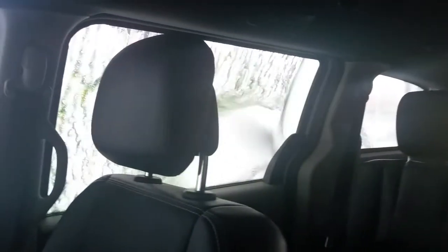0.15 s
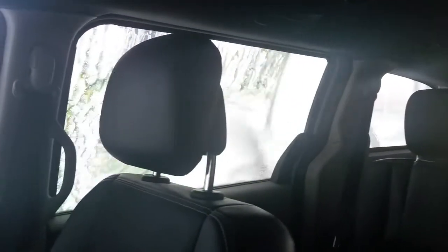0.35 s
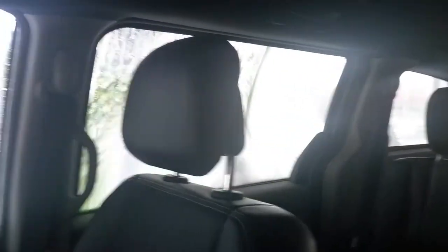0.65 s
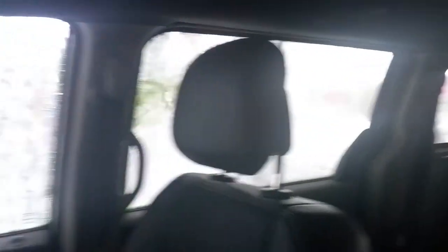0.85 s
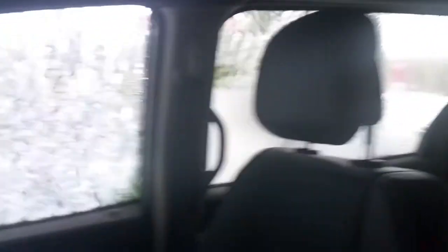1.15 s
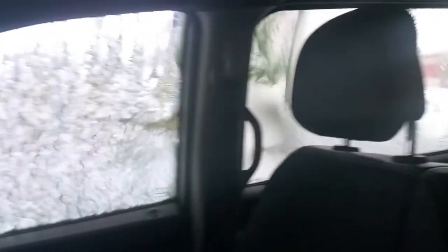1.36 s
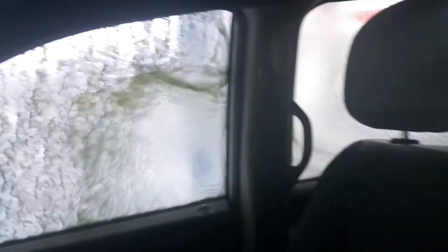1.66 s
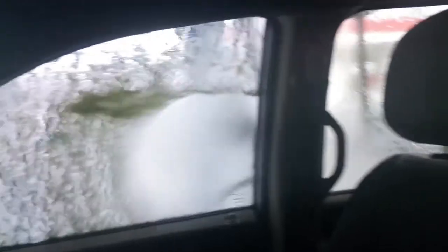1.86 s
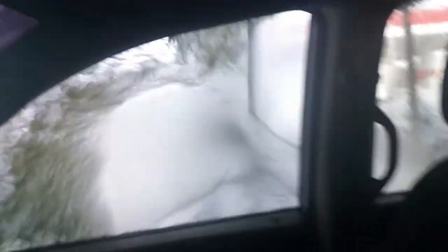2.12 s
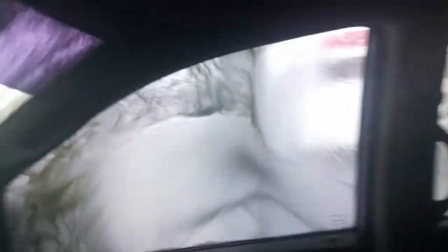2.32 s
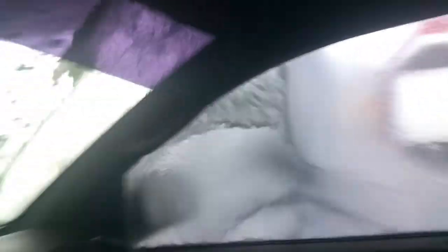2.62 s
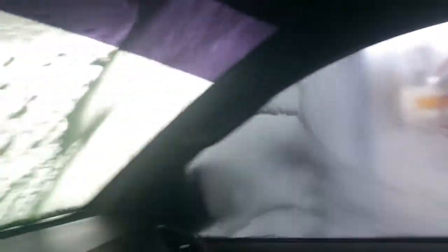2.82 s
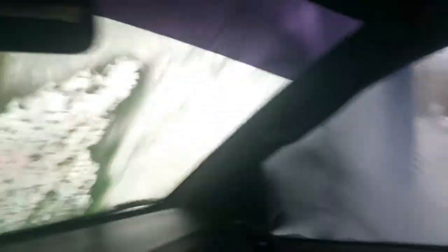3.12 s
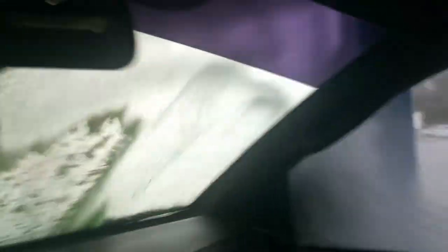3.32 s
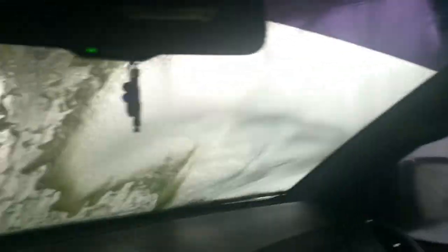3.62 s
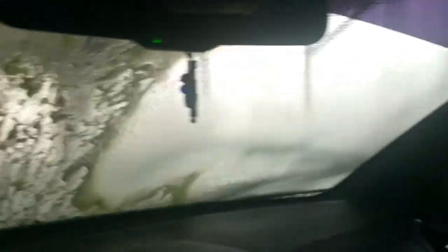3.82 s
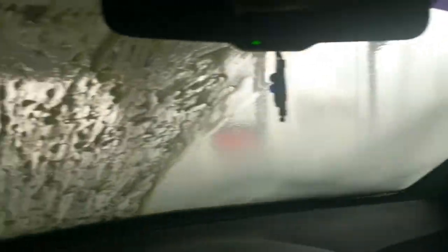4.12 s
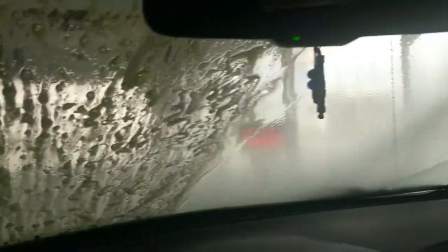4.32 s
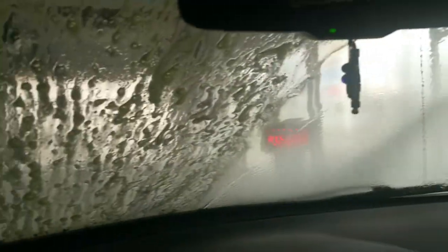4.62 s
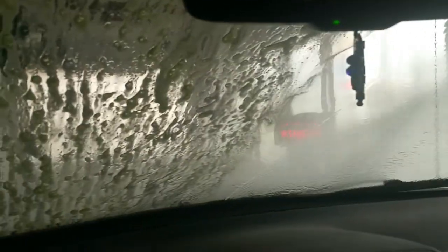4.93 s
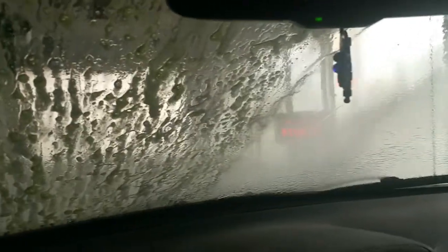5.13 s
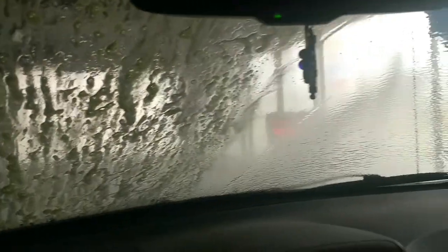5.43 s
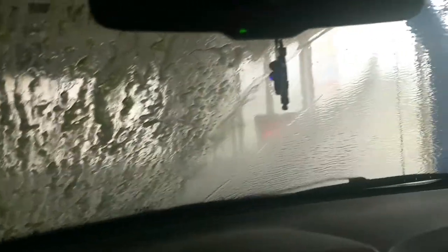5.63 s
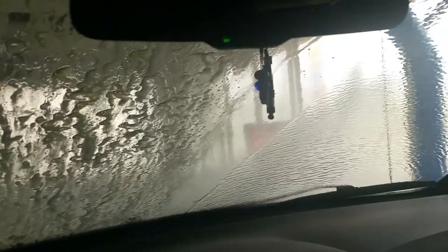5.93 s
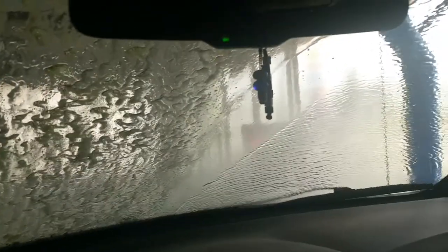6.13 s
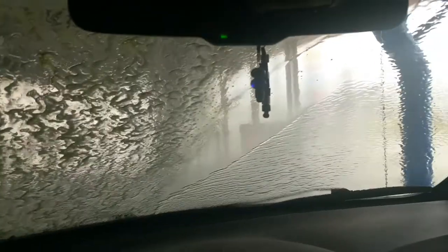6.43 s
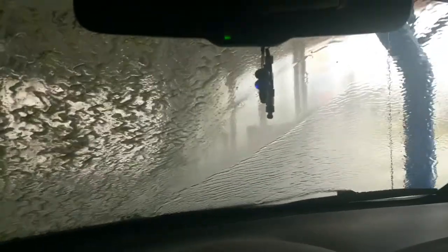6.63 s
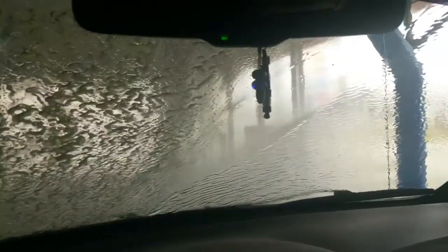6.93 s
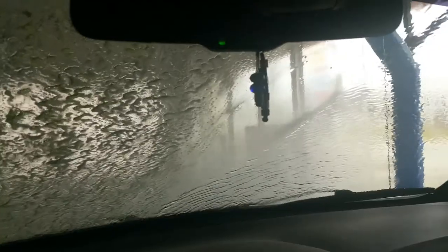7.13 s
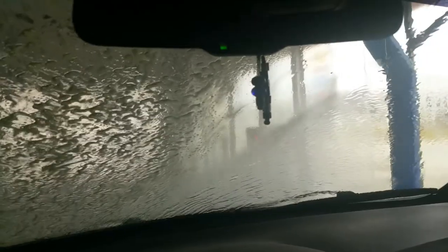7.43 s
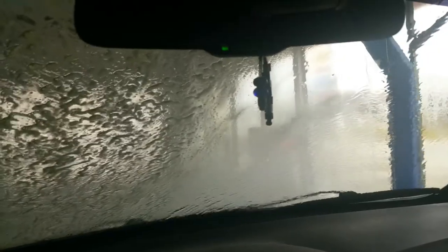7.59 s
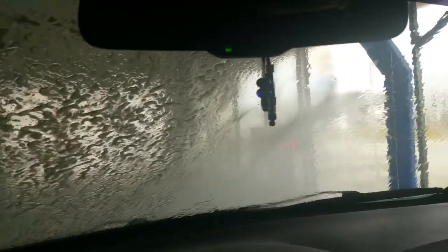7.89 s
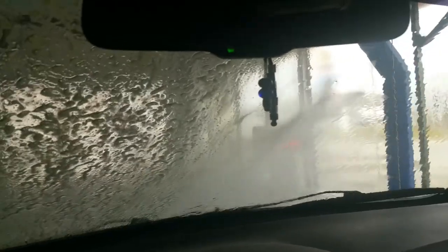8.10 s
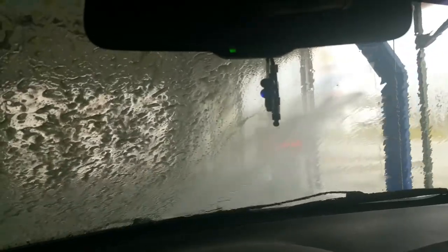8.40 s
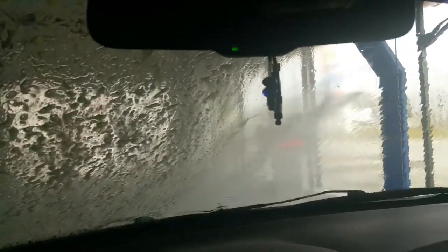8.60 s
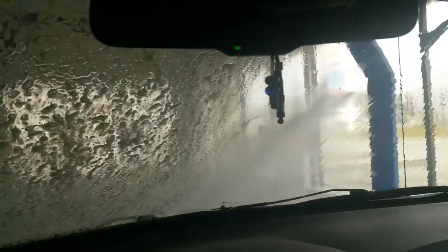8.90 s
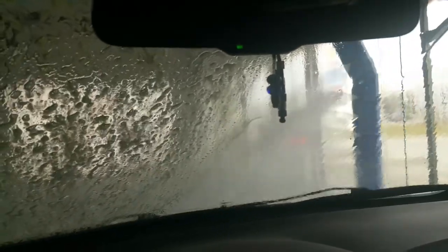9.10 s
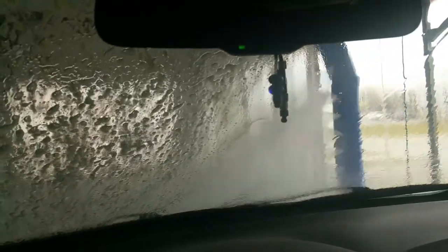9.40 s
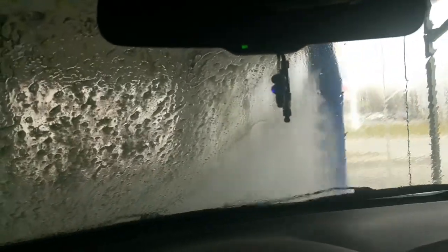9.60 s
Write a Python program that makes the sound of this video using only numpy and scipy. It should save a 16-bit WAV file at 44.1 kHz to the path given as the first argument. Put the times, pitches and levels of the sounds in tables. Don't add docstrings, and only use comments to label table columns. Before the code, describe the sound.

Continuous water noise heard by a handheld stereo microphone in a small padded cabin. Bursting spray hisses against side windows while doors, panes and sheet metal drum and resonate unevenly. After about four seconds the spray moves to the front, loses its sizzle and quietens to a muffled, low roar, with one faint dull knock on the roof late on.

```python
import sys
import numpy as np
from scipy import signal
from scipy.fft import rfft, irfft
from scipy.io import wavfile
from scipy.ndimage import uniform_filter1d

SR = 44100
rng = np.random.default_rng(int(sys.argv[2]) if len(sys.argv) > 2 else 0)


def wav_record(signal):
    frames = np.transpose(np.atleast_2d(signal))
    bounded = np.clip(frames, -1, 1)
    quanta = np.round(bounded * 32767).astype(np.int16)
    wavfile.write(sys.argv[1], SR, quanta)


def boost(x):
    u = np.asarray(x, float) / 20
    return 10 ** u


N = 429975
SIZE = 432000
SLOW = 10


FACING_AHEAD = [
    0.02,
    .4,
    .95,
    1.05,
]
# time in seconds, panel frequency in Hz, change in dB, half length in seconds.
CROSSINGS = [(0.0, 342, -6, 0.096), (2.106, 130, 6, 0.21), (2.16, 193, -2, 0.3), (2.646, 129, -4, 0.098),
             (2.7, 44.7, 4, 0.13), (2.704, 256, 4, 0.074), (3.057, 500, -5, 0.12), (3.12, 350, -4.5, 0.29),
             (3.64, 900, 7.5, 0.19), (3.72, 130, -14, 0.061), (4.077, 346, 5.5, 0.17),
             (4.26, 189, -7, 0.17), (4.792, 104, 2.5, 0.1), (5.104, 130, 8, 0.13), (5.28, 100, -9, 0.13),
             (6.42, 190, 4.5, 0.35), (6.48, 129, -2.5, 0.2), (6.84, 44.7, 5, 0.22), (7.26, 103, -10, 0.08),
             (7.44, 195, 6.5, 0.13), (8.1, 102, 2, 0.29), (8.4, 346, 3.5, 0.14), (8.52, 45, -7, 0.13),
             (8.58, 190, 0, 0.35), (8.94, 129, 5, 0.1), (9.6, 682, -1, 0.13)]
# time in seconds, part frequency in Hz, change in
# dB, half length in seconds.
PANEL_SWELLS = [(2.06, 255, -4, 0.071), (1.33, 255, 2.5, 0.11), (1.82, 540, 2.5, .1), (.6, 255, 3, .1),
                (.1, 900, -3, 0.092), (2.778, 590, 7, .03), (3.3, 346, 2.5, 0.13), (5.75, 500, 2, .1),
                (.78, 164, 5, 0.12), (1.9, 165, 4, .15), (3.6, 165, 4.5, 0.28), (4.9, 165, 3.5, 0.21),
                (6.3, 168, 5, 0.093), (8.85, 165, -5, 0.11), (9.55, 165, -2, .15), (.5, 45, 2, .4),
                (3.2, 125, 2.5, 0.16), (4.514, 130, -9, 0.066), (4.1, 50, -4, .1), (4.45, 50, 4, .1),
                (5.1, 100, -1, .08), (6.6, 100, 1.5, .12), (0.523, 417, 5, .05), (0.804, 500, 2, .05),
                (.82, 255, -4, 0.13), (1.2, 346, 3, 0.16), (1.74, 189, 1, 0.11), (1.36, 860, -3, 0.12),
                (1.997, 346, 6, 0.059), (2.24, 346, -3, 0.054), (2.96, 682, 2.5, 0.19),
                (3.45, 500, -1.5, 0.12), (4.063, 420, 7, 0.043), (4.23, 500, 7.5, 0.033),
                (4.23, 682, 5, 0.035), (4.36, 860, 2, .2), (4.642, 346, 3.5, .1), (5.36, 500, 1.5, 0.12),
                (5.48, 860, 4, .2), (9.32, 860, 6, .1), (9.56, 346, 4.5, 0.12)]
# time in seconds, panel frequency
# in Hz, change in dB, half length in seconds.
SURGES = [(0.09, 860, -4, 0.057), (0.35, 171, -15, 0.071), (0.592, 346, 2.5, 0.21), (0.83, 130, -1, 0.12),
          (1.15, 167, -2, 0.13), (1.66, 168, -5, 0.14), (1.87, 255, 2, 0.22), (1.95, 130, -4, 0.13),
          (2.01, 104, 2.5, 0.13), (2.69, 104, -2.9, 0.1), (3.09, 205, 3.5, 0.13), (3.141, 168, -5, 0.23),
          (3.21, 103, -0.5, 0.25), (3.78, 130, -2.7, 0.25), (3.78, 682, -5, 0.14), (3.83, 346, -2.5, 0.25),
          (4.24, 205, 4, 0.19), (4.65, 130, 4.5, 0.085), (4.78, 205, -4.2, 0.18), (5.14, 104, -5, 0.14),
          (5.8, 205, 3.5, 0.2), (5.97, 130, 2, 0.07), (6.42, 346, 4.5, 0.19), (6.6, 170, 2.5, 0.22),
          (7.36, 104, -5, 0.07), (7.56, 255, 2, 0.2), (7.65, 205, -6, 0.11), (7.79, 168, 6, 0.12),
          (8.16, 255, -1.5, 0.1), (8.495, 130, 2, 0.14), (9.41, 130, 2.5, 0.11)]


def rms_one(x):
    return x / np.sqrt(np.mean(x ** 2) + 1e-20)


def in_time(rows, count=1):
    s, *columns = np.transpose(rows)
    t = np.arange(0, SIZE, count) / SR
    return [np.interp(t, s, column) for column in columns]


def at_hz(points, hz, order=1):
    points = np.array(points)
    return np.interp(np.log(hz), np.log(points[:, 0]), points[:, order])


def drift(rate):
    pole = np.exp(-80 * np.pi * rate / SR)
    white = rng.standard_normal(SIZE // 40 + 2002)
    slow = signal.lfilter([1], [1, -2 * pole, pole * pole], white)[2000:]
    return np.interp(np.arange(SIZE) / 40, np.arange(len(slow)), rms_one(slow))


def panned(x, pan_db):
    return x * boost(np.array([[1], [-1]]) * pan_db / 2)


def shares(count=1):
    # time in seconds, place [0-3].
    path = [
        (0, 0),
        (1.0, -0.03),
        (1.85, 1),
        (3.7, 1),
        (4.0, 1.34),
        (4.45, 2),
        (5.4, 2),
        (6.0, 3),
        (9.75, 3),
    ]
    place = in_time(path, count=count)[0]
    return [np.clip(1 - abs(place - k), 0, 1) for k in range(4)]


def cabin_echoes(count, t60):
    t = np.arange(4000 // count) * count / SR
    after_first_wall = t > .004
    paths = rng.standard_normal((2, len(t))) * boost(-60 * t / t60) * after_first_wall
    energy = np.sum(paths ** 2, axis=1, keepdims=True)
    return rfft(paths / np.sqrt(energy), SIZE // count)


def stereo_white(ahead, ripple, spot, count=1):
    # frequency in Hz, likeness [-1 to 1] facing the side,
    # likeness facing ahead, left over right in dB facing the side, the same facing ahead.
    ports = [(50, .98, .995, 1.9, 1.6), (105, .989, .955, .4, 1.8), (135, .985, .95, 1.5, 2),
             (170, .93, .935, -.3, 2.4), (205, .992, .92, .2, -.7), (260, .955, .96, -.2, 0),
             (340, .924, .68, -.7, 4.2), (405, .87, .7, .8, -.8), (480, .84, .68, -.3, .6),
             (580, .74, .75, .6, .1), (680, .7, .6, -.7, -1), (820, .45, .15, 1.2, -1.4),
             (940, .3, -.4, 1.9, -1.6), (1050, .15, -.27, 2.5, -1.7), (1250, .07, -.08, 3, -1.7),
             (1500, -.35, -.25, .7, -2.3), (1640, -.5, -.35, -.3, -2.4), (1850, -.1, -.08, -1.8, -2.6),
             (2150, .35, .33, .2, -1.6), (2550, .05, .3, 1, -.5), (2850, -.08, 0, .9, 0),
             (3200, -.05, -.38, -.3, .6), (3600, -.2, -.1, -1.3, .7), (4400, -.05, .1, -2.3, -.2),
             (5500, -.03, -.08, -1.5, -.8), (6500, 0, 0, -3.7, -3.2), (7200, 0, 0, -10, -6),
             (8000, 0, 0, -3.5, -1), (9500, 0, 0, -2.6, -1.2), (15000, 0, 0, -2.9, .2)]
    # frequency in Hz, quarter-cycle likeness [-1 to 1]
    leads = [(250, 0, 0), (430, .12, .1), (600, .25, .25), (740, .05, .5), (860, -.1, .35),
             (1030, .05, .05), (1300, .28, .05), (1550, .05, 0), (1900, -.28, .2), (2200, -.05, 0),
             (2600, 0, -.25), (3100, 0, 0), (3500, -.1, .12), (4400, 0, 0)]
    hz = np.fft.rfftfreq(SIZE // count, count / SR) + 1
    real, imaginary = rng.standard_normal((2, 2, len(hz))) * np.sqrt(SIZE / count / 2)
    mid, side = real + 1j * imaginary
    to_mid, to_side = cabin_echoes(count=count, t60=.07)
    side = np.sqrt(1 - spot) * side + np.sqrt(spot) * mid * to_side
    mid = mid * (1 + ripple * to_mid) / np.sqrt(1 + ripple ** 2)

    def turned(points, order):
        return (1 - ahead) * at_hz(points, hz, order=order) + ahead * at_hz(points, hz, order=order + 1)

    coherence = turned(ports, 1) + 1j * turned(leads, 1)
    tilt_db = turned(ports, 3)
    alike, lead = np.clip(abs(coherence), 0, .995), np.angle(coherence)
    sign = np.array([[1], [-1]])
    pair = np.sqrt(1 + alike) * mid + np.sqrt(1 - alike) * side * sign
    return hz, pair * boost(sign * tilt_db / 2) * np.exp(-.5j * sign * lead)


def answers(parts, centres_hz, crossings, count=1):
    # time in seconds, level in dB.
    thrust = [(0.0, -28.5), (0.62, -28), (1.52, -28.5), (2.12, -25.5), (2.54, -24.5), (2.72, -24.5),
              (3.5, -30), (3.92, -36), (4.1, -35.5), (4.34, -38), (4.46, -39.5), (4.7, -37.0),
              (5.42, -40.0), (6.14, -43), (6.38, -41.5), (7.04, -45), (8.66, -48.5), (9.75, -43)]
    # time in seconds, level in dB.
    spray_bursts = [(0.0, -32), (1.16, -32.0), (1.34, -31), (1.76, -36), (1.94, -32), (2.96, -29),
                    (3.14, -28), (3.74, -33), (4.1, -33.5), (4.22, -34), (4.58, -47.5), (4.7, -49.5),
                    (4.94, -49.5), (5.36, -48.5), (5.66, -51.5), (7.46, -53.5), (8.72, -54.5),
                    (9.75, -52.5)]
    reach_octaves = 0.17
    thrust_db = in_time(thrust, count=SLOW)[0] + 35
    spray_db = in_time(spray_bursts, count=SLOW)[0] + 45
    t = np.arange(0, SIZE, SLOW) / SR
    places = np.transpose(shares(count=SLOW))
    swells = [(hz, db * np.exp(-.5 * ((t - s) / np.maximum(half, .03)) ** 2))
              for s, hz, db, half in crossings]
    wanted = np.arange(0, SIZE, count) / SR
    levels = []
    for part, centre in zip(parts, centres_hz):
        level = places @ part[:4] + part[4] * thrust_db + part[5] * spray_db
        for hz, swell in swells:
            level = level + swell * np.exp(-.5 * (np.log2(hz / centre) / reach_octaves) ** 2)
        levels.append(np.interp(wanted, t, level))
    return levels


def drummed(parts, groups, crossings, sharp, even):
    out = 0
    centres = [np.exp(np.mean(np.log([mode[0] for mode in modes]))) for modes in groups]
    for level_db, modes in zip(answers(parts, centres, crossings, count=SLOW), groups):
        group = 0
        for place, share in enumerate(shares(count=SLOW)):
            hz, push = stereo_white(FACING_AHEAD[place], ripple=.05, spot=.2, count=SLOW)
            power = 0
            for centre, width, *db in modes:
                detuning = (hz - centre ** 2 / hz) / width
                power = power + boost(2 * db[place]) / (1 + detuning ** 2) ** sharp
            group = group + np.sqrt(share) * rms_one(irfft(push * np.sqrt(power)))
        swell = uniform_filter1d(np.mean(group ** 2, axis=0), size=500)
        swell = uniform_filter1d(swell, size=500)
        steadied = group / swell ** (even / 2)
        out = out + boost(level_db) * rms_one(steadied)
    return SLOW * irfft(rfft(out), SIZE)


def pump_rumble():
    pump = [
        (-44, -39.5, -39.5, -39.5, 0.17, 0.06),
    ]
    pump_modes = [
        [(30, 20, -16, -13, -13, -8), (52, 39, 0, 6, 5, -2)],
    ]
    return drummed(pump, pump_modes, CROSSINGS, sharp=1.74, even=0.49)


def knocks(t60):
    # time in seconds, peak in dB, pitch in Hz.
    drops = [
        (8.248, -36, 570),
    ]
    # multiple of the drop's pitch [ratio], level in dB.
    roof_ring = [
        (1, 0),
        (.72, -3),
        (1.38, -4),
        (2.1, -7.5),
    ]
    out, t = np.zeros(SIZE), np.arange(2000) / SR
    band = signal.butter(4, [450, 1330], "band", fs=SR, output="sos")
    crack = signal.sosfilt(band, rng.standard_normal(2000))
    for s, db, hz in drops:
        at = round(s * SR)
        ring = sum(boost(mode_db) * np.sin(2 * np.pi * multiple * hz * t) for multiple, mode_db in roof_ring)
        out[at:at + len(t)] += boost(db - 1 - 60 * t / t60) * (.2 * rms_one(crack) - ring)
    return out


def bonnet_boom():
    boom = [
        (-47, -47, -41, -46, 1.0, 0.01),
        (-68, -62, -63, -62, .3, .3),
    ]
    boom_modes = [
        [(130, 5.1, 0, 0, 0, 0)],
        [(1940, 90, 0, 0, 0, 0)],
    ]
    # time in seconds, frequency in Hz, change in dB, half length in seconds.
    booming = [
        (9.42, 1940, 10, .15),
        (5.1, 130, 7, .14),
        (5.37, 130, 6, .07),
        (5.92, 130, 5, .06),
        (7.08, 130, 5, .06),
        (2.1, 130, 5, .2),
    ]
    return drummed(boom, boom_modes, booming, sharp=1.4, even=0.6)


def sheet_metal():
    sheet = [
        (-48.5, -40, -50, -45, 0.54, 0.0058),
        (-47.5, -50.5, -43.5, -44, 1.26, 0),
        (-59, -67, -64, -62, .45, 0.32),
        (-44.5, -55.5, -58, -56, 0.6, 0.0078),
    ]
    sheet_modes = [
        [(398.5, 7.6, 0, -2.5, -2, .5), (411.2, 9.7, -1, 4, .5, -2)],
        [(665.3, 8.4, -5, -3, 2, 0.27), (688.4, 12, -6, 1.5, -4, -1.8)],
        [(1823, 17, 0, 0, 0, 0)],
        [(829, 52, 0, 0, 0, 0)],
    ]
    # time in seconds, mode in Hz, change in dB, half length in seconds.
    singing = [(9.55, 676, 2.5, .15), (8.8, 676, 2.5, 0.11), (4.5, 676, 6.5, 0.091), (4.95, 676, 1, .2),
               (5.5, 676, 2, .2), (6.0, 405, 3, 0.16), (3.527, 860, 15.5, .05), (3.67, 900, 15, 0.13),
               (0.34, 405, 6, 0.17), (.78, 676, 2, 0.17), (1.22, 405, 6, .2), (2.02, 405, 9, .1),
               (2.6, 405, 9, 0.15), (3, 405, -9, 0.16), (3.3, 676, 10, 0.19), (3.55, 405, 3, .1),
               (3.84, 1820, 7, .35), (4.07, 405, -13, 0.28), (4.1, 676, -12, 0.24), (5.34, 405, 7.5, .1),
               (6.26, 676, 5.5, 0.16), (6.902, 405, -3, .2), (8.2, 676, -4, 0.59), (8.46, 405, 3.5, 0.34),
               (9.61, 676, 9, 0.084)]
    return drummed(sheet, sheet_modes, singing, sharp=1.45, even=0.69)


def doors_and_cabin():
    doors = [
        (-30.5, -33.5, -31.5, -35, 0.83, -0.14),
        (-33.5, -29.5, -30, -31.5, 1.11, -0.4),
        (-45, -37.5, -35, -34.5, 1.11, -0.041),
        (-34, -35.5, -37, -35.5, 1.11, 0.019),
        (-31.5, -31.5, -33.0, -31.0, 0.98, -0.12),
    ]
    door_modes = [
        [(103.8, 22, 0, 0, 0, 0)],
        [(130.2, 20, 0, 0, 0, 0)],
        [(169.9, 11.7, 0, 0, 0, 0)],
        [(205, 15.6, 0, 0, 0, 0)],
        [(231.9, 16, 7.3, 0.28, 3.5, 1), (251.3, 9.5, 10, 0.66, 3.5, 2.5), (279.4, 34.6, 6, 0.28, -4.5, -5)],
    ]
    return drummed(doors, door_modes, CROSSINGS + PANEL_SWELLS + SURGES, sharp=1.5, even=0.34)


def ringing_panes():
    panes = [
        (-37.5, -37.5, -37.5, -40, 0.98, 0.058),
        (-34.5, -36, -39.5, -40.5, 0.92, 0.02),
        (-42, -41, -43, -39, 1, 0.15),
        (-38.5, -38, -46.5, -48.5, 0.71, 0.096),
    ]
    pane_modes = [
        [(321.4, 17, 0.5, 0.16, 10, 0), (367, 39, -3.5, -1.1, -0.5, -5.5)],
        [(448, 47, -1, 1, -2.5, 2.5), (498, 26, -1.2, 0.8, -3, -5.5), (568, 54, -0.29, -2.2, -6, -3)],
        [(629, 60, 0.79, -1.9, 1.5, 0), (744, 77, 0.21, 0.89, -2, -1)],
        [(820, 145, 4.5, 1, 5, -1), (930, 270, 1, -2.5, -8, -6)],
    ]
    return drummed(panes, pane_modes, CROSSINGS + PANEL_SWELLS + SURGES, sharp=1.12, even=0.11)


def splash(pans_db, flutter_db, patchy_db):
    layers = [
        (-43.5, -41, -44.5, -45, 0.27, 0.54),
        (-44, -42.5, -42.5, -41.5, 0.0024, 1.017),
        (-47.5, -46.5, -47.5, -51, -0.076, 1.026),
        (-53, -55, -59, -61, -0.07, 1.1),
    ]
    band_edges = [
        1000,
        1900,
        3800,
        7600,
        15700,
    ]
    # frequency in Hz, level in dB per Hz.
    rear = [(470, -30), (800, -5), (1050, -8), (1350, -8.5), (1650, -14), (2090, -11.5), (2390, -14),
            (3270, -11), (4930, -9.5), (5650, -5.5), (6570, -12.5), (7250, -11), (8320, -19.5),
            (12100, -25), (15700, -31.5)]
    # frequency in Hz, level in dB per Hz.
    front = [(470, -56), (800, -6), (1010, -3.5), (1150, 1.5), (1600, -6), (2140, -10), (3520, -13.5),
             (4630, -17), (5900, -16.5), (7070, -19.5), (8420, -26), (15100, -32), (15700, -33)]
    # frequency in Hz, level in dB per Hz.
    foot = [(470, -30), (800, 1), (917, -5), (1080, -4), (1150, -6.5), (1650, -6), (2090, -10.5),
            (3000, -11), (4750, -22.5), (6990, -22), (8630, -31), (11900, -30.5), (15700, -42)]
    # frequency in Hz, level in dB per Hz.
    bonnet = [(470, -30), (800, -8), (862, -12), (952, -8), (1280, -11), (1690, -11), (1870, -12),
              (2920, -6), (5050, -17), (6020, -18), (8420, -33.5), (15100, -41), (15700, -45)]
    # time in seconds, band frequency in
    # Hz, change in dB, half length in seconds.
    flares = [(1.1, 2687, 1.5, 0.076), (1.68, 2687, 1.5, .04), (2.36, 1378, 1.5, .05),
              (1.95, 1378, 2.5, .06), (5.1, 2687, 0.5, .05), (9.15, 1378, 1, .12), (3.31, 2687, 1, 0.062),
              (4.31, 2687, 1, .05), (.13, 10900, 1, 0.052), (5.1, 10900, -1.2, .2), (6.14, 1378, 1, 0.11),
              (8.03, 1378, -1.5, 0.12), (1.883, 2687, 2.5, 0.036), (1.64, 5374, -1.5, .04),
              (3.13, 2687, 1, 0.14), (0.26, 1378, 2, 0.075), (.68, 1378, -3.5, .1), (0.17, 2687, 1, .1),
              (1.55, 5374, 1, .08), (1.6, 10900, -1.5, .06), (1.8, 1378, 1, .08), (2.22, 2687, 2, 0.083),
              (3.9, 5374, 1, .15), (4.2, 10900, -1, .2), (1.04, 10900, -1, 0.29), (1.71, 5374, -3, 0.077),
              (2.37, 2687, -1.5, 0.47), (3.0, 1378, -2, 0.27), (3.1, 5374, -1, 0.26),
              (4.72, 2687, 0.5, 0.12), (4.88, 10900, -2, 0.07), (5.24, 1378, 2.5, 0.065),
              (5.24, 10900, 1, 0.04), (5.64, 1378, 2, 0.12), (7.12, 1378, 1.5, 0.13),
              (9.36, 2687, 1.5, 0.07), (9.6, 5374, -1.5, 0.07), (9.72, 1378, 2.5, 0.14)]
    edges, hz = np.array(band_edges), np.fft.rfftfreq(SIZE, 1 / SR) + 1
    centres = np.log(np.sqrt(edges[1:] * edges[:-1]))
    flutter = drift(24.0)
    overlaps = [np.interp(np.log(hz), centres, row) for row in np.eye(4)]
    first_bins = np.searchsorted(hz, edges)
    bands = np.zeros((4, 2, SIZE), np.float32)
    low_cut = np.clip(np.log2(hz / 700) / 0.67, 0, 1)
    for colour, share, ahead in zip((rear, front, foot, bonnet), shares(), FACING_AHEAD):
        push = stereo_white(ahead, ripple=.22, spot=.15)[1].astype(np.complex64)
        shaped = boost(at_hz(colour, np.minimum(hz, 15000))) * low_cut
        present = np.sqrt(share).astype(np.float32)
        for k, overlap in enumerate(overlaps):
            inside = shaped[first_bins[k]:first_bins[k + 1]]
            scale = np.sqrt(4 * np.sum(inside ** 2) / SIZE)
            bands[k] += present * irfft(push * (shaped * overlap / scale).astype(np.float32))
    out = 0
    for k, level_db in enumerate(answers(layers, np.exp(centres), flares)):
        flutter_part = flutter_db * flutter * (k + 1) / 4
        gain = boost(level_db + flutter_part + patchy_db * drift(35.0))
        out = out + panned(bands[k], pans_db[k]) * gain
    return out


def scene():
    # time in seconds, left over right in dB of drumming,
    # of splash body, of rush, of hiss, of sizzle.
    balance = [(0, 0, -1, .1, .1, -3), (.8, -0.6, 1.7, .1, .1, -0.5), (1.45, -0.1, 0.17, -.5, -1.5, -.3),
               (2.0, 0.2, 0.55, .4, 1.8, 3), (2.45, 0.2, 1.5, 1.2, .6, 1.5),
               (3.07, -0.2, -1.5, -1, 0.5, -5.5), (3.8, 1.5, -2.2, -0.052, 1, -0.5),
               (4.4, 0, -.3, .1, -0.27, -2), (5.4, -0.5, .1, -.6, -0.67, -2), (6.2, 0.2, -.3, .1, 0.25, .1),
               (9.75, -0.2, .1, -.1, .1, .6)]
    low_pan_db, *high_pans_db = in_time(balance)
    body = pump_rumble() + knocks(t60=0.056) + bonnet_boom()
    body = body + sheet_metal() + doors_and_cabin() + ringing_panes()
    spray = splash(high_pans_db, flutter_db=0.52, patchy_db=0.57)
    return (panned(body, low_pan_db) + spray)[:, :N]


def band_limit(x):
    return signal.sosfilt(signal.butter(12, 16450, fs=SR, output="sos"), x)


def record(dry):
    low_pass = signal.ellip(14, .3, 80, 15705, fs=SR, output="sos")
    cut = signal.sosfilt(low_pass, dry)
    finished = cut * np.clip(np.arange(N, 0, -1) / 130, 0, 1)
    return band_limit(finished)


dry = scene()
out = record(dry)
wav_record(out)
```